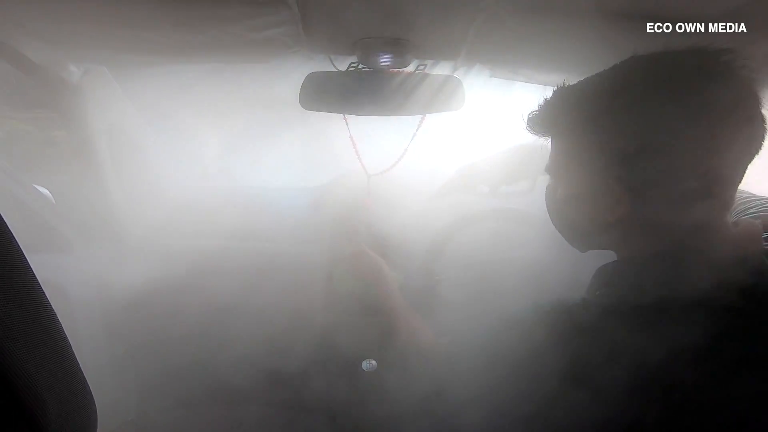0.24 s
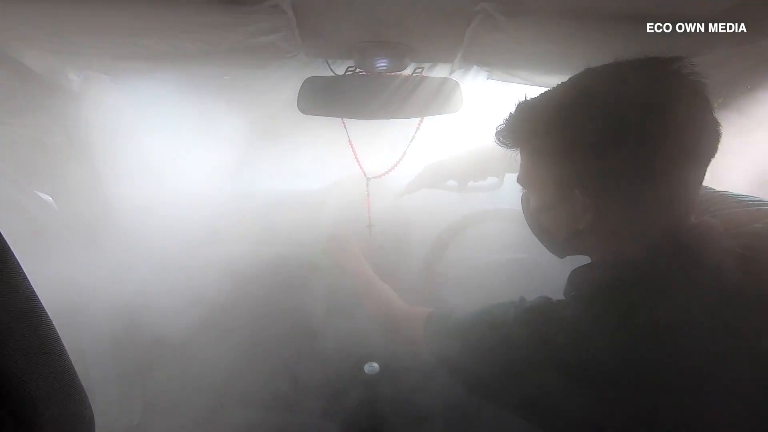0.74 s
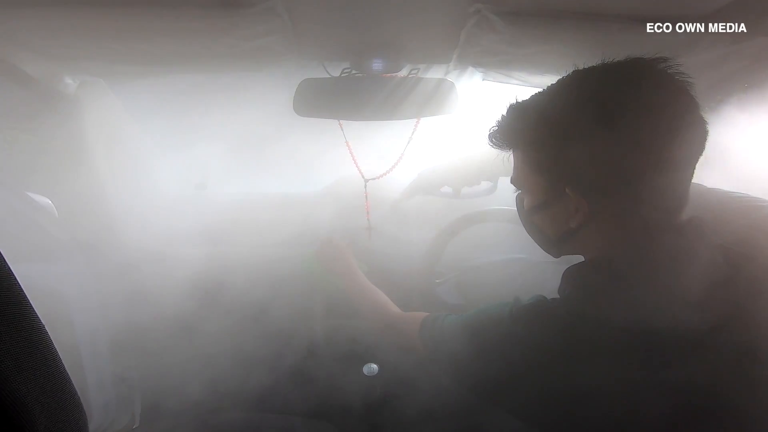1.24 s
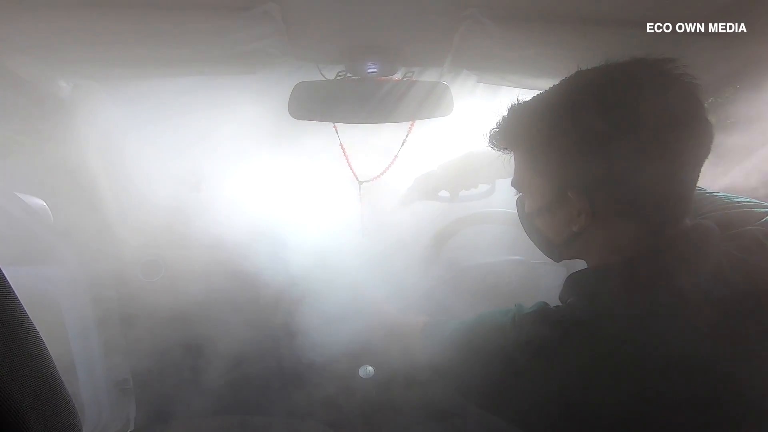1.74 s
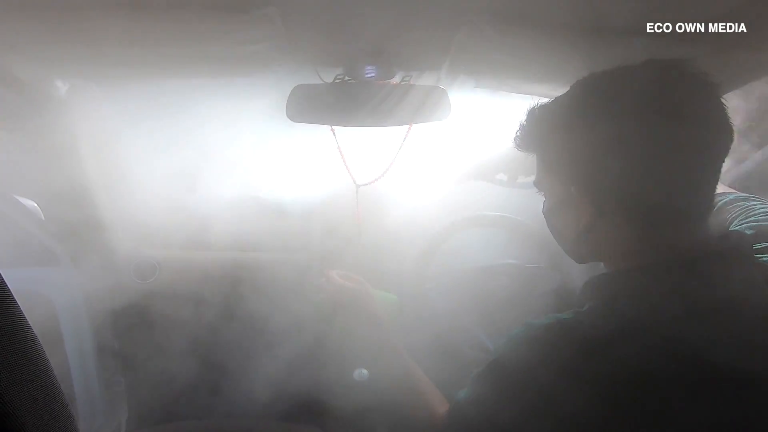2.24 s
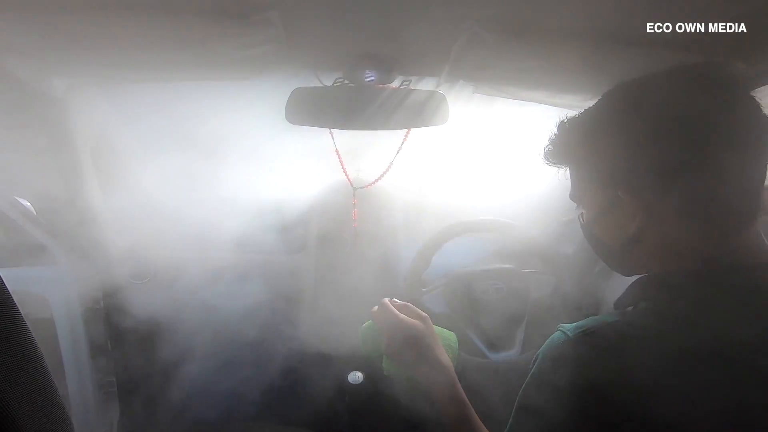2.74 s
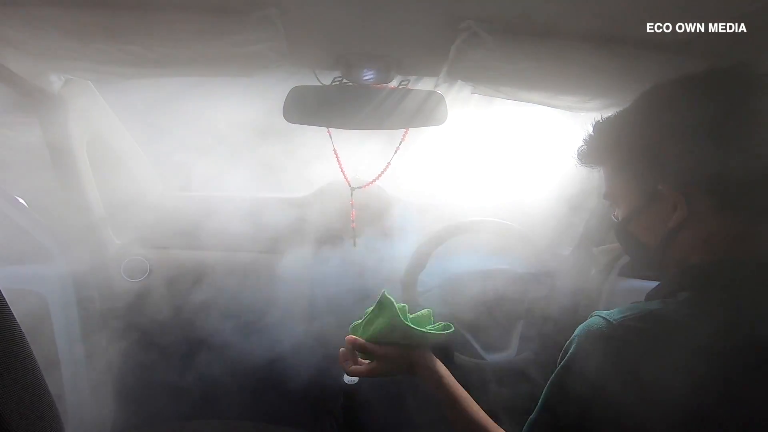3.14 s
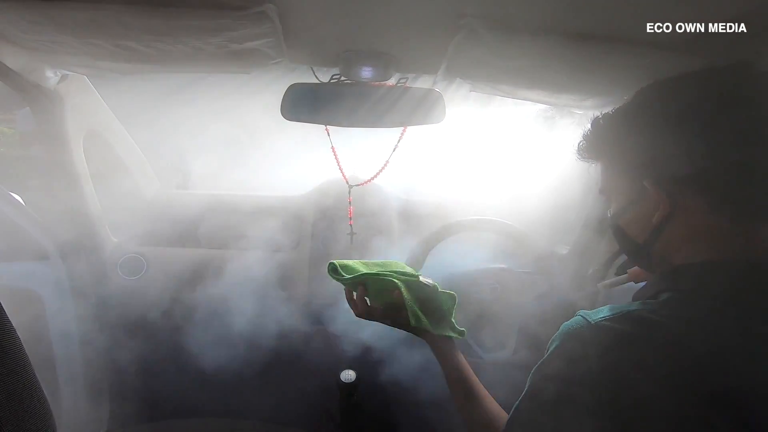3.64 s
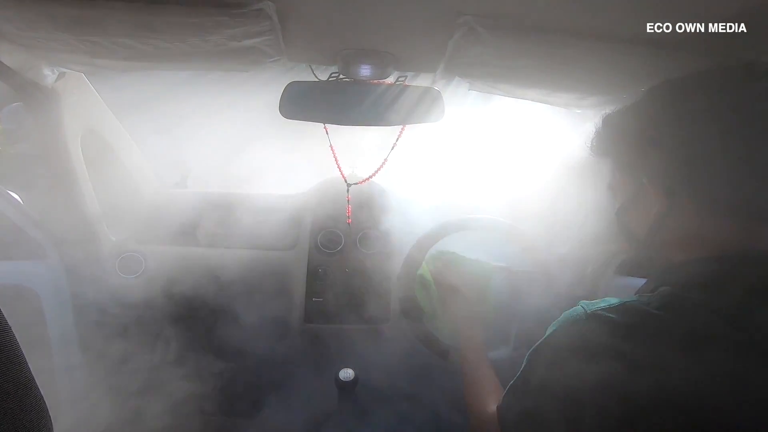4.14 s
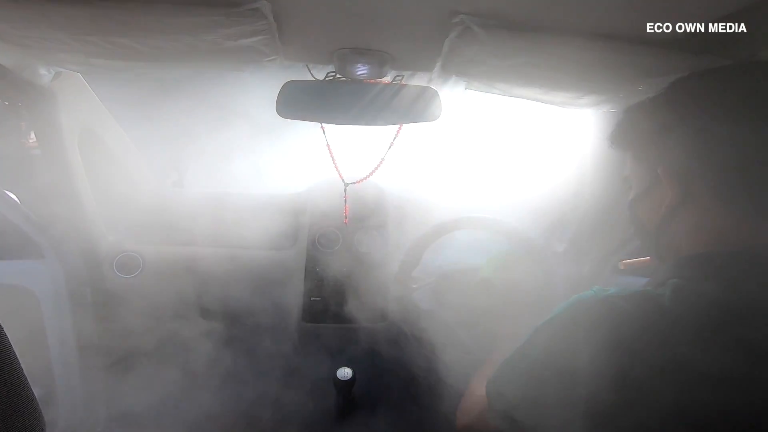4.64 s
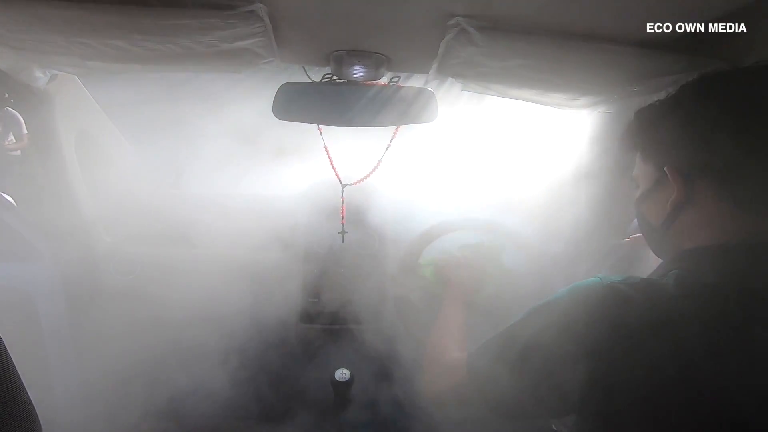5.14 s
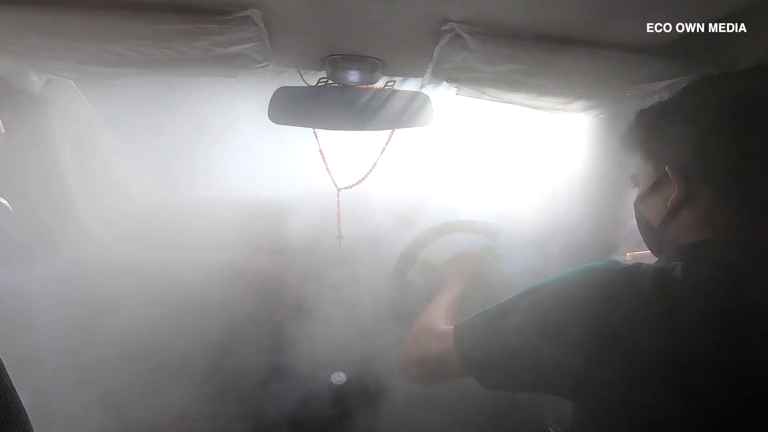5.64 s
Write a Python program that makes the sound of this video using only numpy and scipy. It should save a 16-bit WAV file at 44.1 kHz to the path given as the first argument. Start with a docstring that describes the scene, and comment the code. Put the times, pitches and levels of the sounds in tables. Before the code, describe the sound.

A loud, unbroken hiss of pressurised steam sweeps over a car dashboard, its tone shifting with quick rough strokes above a faint low hum.

```python
"""Steam cleaner on a dashboard

A steam cleaner's nozzle is swept over a car's dashboard, heard in mono from the back of the cabin.
The jet is noise that hisses without a break; a lower, rougher noise roars where it strikes a surface.
Narrow bands of noise ring as the jet passes vents and gaps.
The steam cloud is a soft noisy rumble, and the machine's low hum is a slightly unsteady sine."""
import sys
import numpy as np
from scipy import signal
from scipy.fft import rfft, irfft, next_fast_len
from scipy.io import wavfile
from scipy.ndimage import uniform_filter1d, minimum_filter1d, map_coordinates

SR = 44100
rng = np.random.default_rng(int(sys.argv[2]) if len(sys.argv) > 2 else 0)


def wrap_up_sound(samples):
    """Save the sound to the file named by the first command line argument, as 16-bit audio."""
    columns = np.atleast_2d(samples).T
    # keep every value between -1 and 1, then stretch to whole-number steps
    tamed = np.clip(columns, -1, 1)
    steps = np.round(tamed * 32767).astype(np.int16)
    wavfile.write(sys.argv[1], SR, steps)


N = 260190  # length in samples


def amp(db):
    """Turn decibels into gain."""
    return 10 ** (np.asarray(db) / 20)


def unit(x):
    """Scale x to an average strength (rms) of 1."""
    return x / np.sqrt(np.mean(x ** 2) + 1e-20)


def along(points, hz):
    """Join (frequency, value) points by straight lines on a log frequency axis."""
    point_hz, values = np.transpose(points)
    return np.interp(np.log(hz + 1), np.log(point_hz + 1), values)


def clock():
    """The time of each sample in seconds."""
    return np.arange(N) / SR


def curves(rows):
    """Draw one curve over time for each column after the time column."""
    times, *columns = np.transpose(rows)
    return [np.interp(clock(), times, column) for column in columns]


def wobble(rate):
    """A smooth random curve through `rate` random points a second."""
    points = rng.standard_normal(2048)
    return map_coordinates(points, [np.arange(N) * rate / SR], mode="wrap")


def filtered(x, response):
    """Multiply the spectrum of x by a response that depends on frequency."""
    size = next_fast_len(N + SR // 2)  # spare room for the filter to ring out
    hz = np.fft.rfftfreq(size, 1 / SR)
    return irfft(rfft(x, size) * response(hz), size)[:N]


def rush(spectrum):
    """Noise coloured by a spectrum, at rms 1."""
    noise = rng.standard_normal(N)
    return unit(filtered(noise, lambda hz: amp(along(spectrum, hz))))


def gate(start, length, edge):
    """Up to 1 for `length` seconds, with ramps `edge` seconds long centred on the start and end."""
    t = clock() - start
    return np.clip(np.minimum(t, length - t) / edge + .5, 0, 1)


def reflected(x, ripple_db, ripple_hz, linger):
    """Echoes off glass and trim, as random rounded peaks and deep notches that shift over time."""
    hz, t, z = signal.stft(x, SR, nperseg=2048)
    field = rng.standard_normal(z.shape)
    # smooth the random field across frequency and along time
    across = np.fft.fftfreq(len(hz), hz[1])[:, None] * ripple_hz
    onward = np.fft.fftfreq(len(t), t[1]) * linger
    smoothing = np.exp(-across ** 2 - onward ** 2)
    field = unit(np.fft.ifft2(np.fft.fft2(field) * smoothing).real)
    # round off the peaks but leave the notches deep
    comb = np.minimum(field, 2 * np.tanh(field / 2))
    rippled = signal.istft(z * amp(ripple_db * comb), SR, nperseg=2048)[1]
    return unit(rippled[:N])


# The free jet before its lift and flutter: (time [s], hiss level [dB], sizzle level [dB])
JET_LEVELS = [(0, -23.3, -23.5), (.3, -24, -26), (.5, -25, -23.5), (.75, -23, -26.5), (1.3, -23, -24.5),
              (1.55, -23, -27), (2.1, -22, -26.5), (2.7, -21.5, -29), (3.0, -21.5, -27), (3.2, -22, -30),
              (3.7, -23.5, -31), (4.45, -24, -32), (4.7, -23, -28.5), (5.15, -24, -31), (5.4, -22, -29.5),
              (5.9, -22.5, -28)]
# Colour of the hiss: (frequency [Hz], relative level [dB])
HISS_SPECTRUM = [(250, -24), (800, -27.5), (1400, -19), (2000, -10.5), (2500, -2.5), (2750, -6),
                 (2950, 1.5), (3800, -1), (4550, 3), (5050, 2), (5400, -6), (5900, -11.5), (7000, -17),
                 (12000, -54)]
# Colour of the sizzle: (frequency [Hz], relative level [dB])
SIZZLE_SPECTRUM = [(3000, -25), (5500, -8), (6200, -4.5), (6800, -4), (7800, 1), (9000, 0), (10200, -5),
                   (11300, -5.5), (12600, -11), (13900, -23.5), (15200, -66)]
SHIELD_DB = -2  # change of hiss and sizzle under the strongest stroke


def jet(strength):
    """Turbulence at the nozzle hisses, droplets make a fluttering sizzle, and a near surface weakens both."""
    hiss_db, sizzle_db = curves(JET_LEVELS)
    hiss = reflected(rush(HISS_SPECTRUM), ripple_db=4.0, ripple_hz=80, linger=0.31)
    sizzle = reflected(rush(SIZZLE_SPECTRUM), ripple_db=4.0, ripple_hz=128, linger=0.2)
    hiss_gain = amp(hiss_db + 4.0 + 0.66 * wobble(28.3))
    flutter_db = .5 * wobble(45) + 0.65 * wobble(300)
    free_jet = hiss_gain * hiss + amp(sizzle_db + flutter_db) * sizzle
    shield_db = SHIELD_DB * strength / strength.max()
    return free_jet * amp(shield_db + 0.36 * wobble(11))


# Wiping strokes that bring the jet close to the dashboard, levels before the roar's lift:
# (start time [s], length [s], roar level [dB])
STROKE_TIMES = [(2.646, 0.046, -39), (2.807, 0.087, -37.5), (2.998, 0.047, -36), (3.191, 0.062, -36),
                (3.378, 0.083, -38.5), (3.586, 0.082, -31), (3.795, 0.1, -33.5), (3.954, 0.13, -36),
                (4.172, 0.14, -40), (4.337, 0.27, -34), (4.666, 0.11, -29.5), (4.856, 0.21, -32.5),
                (5.14, .21, -33), (5.434, 0.12, -32), (5.681, 0.13, -30)]
STROKE_EDGE_S = 0.046  # time the jet takes to slide onto or off the surface


def strokes():
    """The wiping motion: contact with the surface (0-1), and the strength of the roar it raises."""
    contact, strength = np.zeros(N), np.zeros(N)
    for start, length, db in STROKE_TIMES:
        touch = gate(start, length, STROKE_EDGE_S)
        contact += touch
        strength += amp(db) * touch
    return np.minimum(contact, 1), strength


# Steady part of the roar on the trim, before the lift: (time [s], level [dB])
WASH_LEVELS = [(0, -33), (.6, -33.5), (1.0, -34), (1.75, -34), (2.3, -39.5), (2.5, -40), (3.15, -45.5),
               (3.7, -41.5), (4.3, -35), (4.62, -41), (5.1, -32.5), (5.6, -40.5), (5.9, -39.5)]
# Colour of the roar: (frequency [Hz], relative level [dB])
ROAR_SPECTRUM = [(150, -25), (310, -23.5), (380, -12), (460, -13.5), (720, -5), (860, -13), (1050, -6),
                 (1350, -5.5), (1600, -3.5), (2050, -0.5), (2700, -2), (4000, -14.5), (8000, -56)]


def impact(strength):
    """The jet breaks up on the dashboard with a lower, rougher roar that surges with each stroke."""
    wash_db, = curves(WASH_LEVELS)
    roar = reflected(rush(ROAR_SPECTRUM), ripple_db=3.0, ripple_hz=60, linger=0.54)
    steady_and_strokes = np.hypot(amp(wash_db), strength)
    lift_db = 9 + 1.47 * wobble(50)
    return steady_and_strokes * amp(lift_db) * roar


# Hollows that ring while the jet blows across them; at one width from the centre the ring is 9 dB weaker:
# (start time [s], length [s], centre [Hz], width [Hz], level [dB], change during a stroke [dB])
HOLLOW_PASSES = [ (0.0, 0.464, 830, 190, -30, 0), (0.0, 0.51, 2340, 260, -29, 0),
                 (0.0, 0.523, 4160, 90, -25, 0), (0.0, 0.57, 4520, 120, -29, 0),
                 (0.516, 0.5, 3550, 198, -28, 0), (0.518, 1.8, 2600, 376, -28.5, 0),
                 (0.785, 0.49, 930, 242, -28, 0), (1.3, 1.26, 860, 260, -41, 0),
                 (1.302, 0.74, 1630, 120, -30, 0), (1.295, 0.88, 2150, 220, -30, 0),
                 (2.29, 0.37, 2280, 170, -29, 10), (2.408, 0.065, 900, 320, -29, 0),
                 (2.558, 0.476, 4220, 380, -23.5, 2), (3.032, 0.16, 3450, 300, -21.5, 5),
                 (3.253, 0.12, 3470, 300, -17.5, 0), (3.465, 0.11, 3310, 250, -18.5, 14.5),
                 (3.67, 0.11, 3380, 260, -19, 12), (3.78, 0.78, 4000, 400, -24.5, 1.5),
                 (3.824, 0.53, 3310, 280, -23, -2.5), (2.6, 1.4, 1970, 377, -37.5, 9),
                 (3.8, 0.805, 1960, 330, -26.5, 5), (4.665, 0.86, 1900, 400, -30, 8),
                 (4.548, 1.15, 4240, 80, -26, -1), (4.67, 0.865, 1040, 150, -42.5, 8.5),
                 (5.555, 0.11, 4800, 403, -24, 0), (5.723, 0.17, 3240, 231, -20, -5), ]


def hollows(contact, fade=0.078):
    """Each gap or vent picks a narrow band out of the jet; a stroke drives the jet into it or takes it away."""
    out = np.zeros(N)
    for start, length, centre_hz, width_hz, db, stroke_db in HOLLOW_PASSES:
        resonance = lambda hz: 1 / (1 + 1j * (hz - centre_hz) / width_hz) ** 3
        ring = unit(filtered(rng.standard_normal(N), resonance))
        out += amp(db + stroke_db * contact) * gate(start, length, fade) * ring
    return out * amp(-0.34 + 0.55 * wobble(13))


# Turbulence of the steam cloud, before its lift: (time [s], level [dB])
CLOUD_LEVELS = [(0, -31.5), (.78, -30), (.95, -37), (1.25, -32), (1.5, -37), (2.2, -36), (3.0, -34),
                (3.55, -41), (4.3, -39), (5.05, -39.5), (5.4, -36.5), (5.9, -35)]
# Colour of the rumble: (frequency [Hz], relative level [dB])
RUMBLE_SPECTRUM = [(12, -23), (25, -1), (45, 2.5), (90, -2), (130, -3), (190, -3.5), (250, -5.5),
                   (310, -13.5), (390, -9), (480, -16.5), (1200, -41)]
# Soft puffs of steam; the length runs from the peak until the puff has dropped to 37 %:
# (peak time [s], length [s], peak level [dB])
STEAM_PUFFS = [(0.7, 0.12, -37), (2.878, 0.02, -25.5), (2.962, 0.022, -25), (3.067, 0.017, -23.5),
               (3.316, 0.039, -29)]


def cloud():
    """Billowing steam makes a wavering low rumble, with a few puffs that swell and die away."""
    rumble_db, = curves(CLOUD_LEVELS)
    rumble = amp(rumble_db + 1.5 + 1.46 * wobble(23.1)) * rush(RUMBLE_SPECTRUM)
    swell = np.zeros(N)
    for peak, length, db in STEAM_PUFFS:
        swell += amp(db) * np.exp(-((clock() - peak) / length) ** 2)
    # colour of the puffs: (frequency [Hz], relative level [dB])
    puff_noise = rush([(25, -17), (65, 4), (130, -4.5), (200, -9), (400, -35), (1500, -68)])
    return rumble + swell * puff_noise


HUM_HZ = 50.8  # average pitch of the machine


def hum(first_db=-36.5, last_db=-42.0):
    """The machine's low hum is a sine that wavers slightly in pitch and level and slowly fades."""
    phase = 2 * np.pi * HUM_HZ * clock() + 0.19 * wobble(5.4)
    waver_db = 1.2 * wobble(6)
    return amp(np.linspace(first_db, last_db, N) + waver_db) * unit(np.sin(phase))


# Resonances of the cabin and trim; the width spans the part above half the lift, in dB:
# (centre [Hz], width [Hz], lift [dB])
CABIN_RESONANCES = [(732, 43, -1.5), (863, 14, 5), (1010, 44, 2), (1393, 29, -6), (1866, 67, -4),
                    (2060, 49, 0), (2590, 39, -1.5), (2528, 30, 5.5), (2725, 116, 1), (3420, 110, 1),
                    (4290, 120, -2), (8760, 120, -4)]


def cabin(hz):
    """The cabin and trim strengthen some frequencies and weaken others."""
    lift_db = 0
    for centre, width, db in CABIN_RESONANCES:
        lift_db = lift_db + db / (1 + (2 * (hz - centre) / width) ** 2)
    return amp(lift_db)


def scene():
    """All sources share the cabin's colour and reach both channels alike."""
    contact, strength = strokes()
    sources = jet(strength) + impact(strength) + hollows(contact) + cloud() + hum()
    mono = filtered(sources, cabin)
    return np.array([mono, mono])


def limited(x, ceiling_db):
    """A limiter eases the gain down and up again within about 10 ms either side of the highest peaks."""
    span = SR // 100  # 10 ms
    needed = np.minimum(1, amp(ceiling_db) / (np.abs(x).max(axis=0) + 1e-9))
    return x * uniform_filter1d(minimum_filter1d(needed, span), span)


TOP_HZ = 15400  # everything from here up is removed


def record(dry):
    """Limit the peaks, then remove the highest treble from each channel."""
    level = limited(dry, ceiling_db=-4.8)
    return np.array([filtered(channel, lambda hz: hz < TOP_HZ) for channel in level])


dry = scene()
out = record(dry)
wrap_up_sound(out)
```